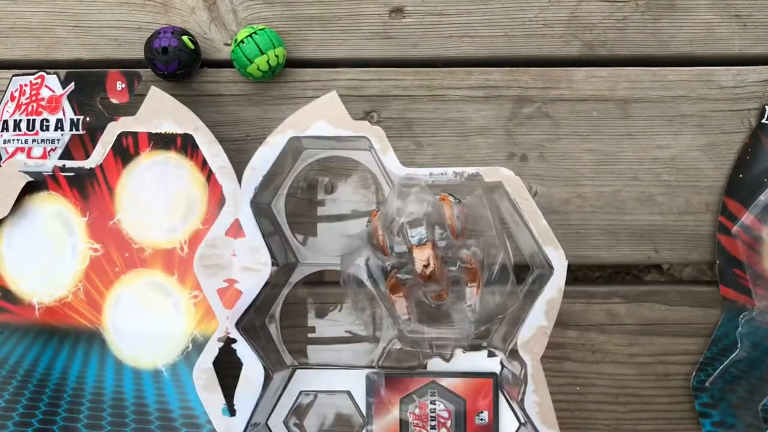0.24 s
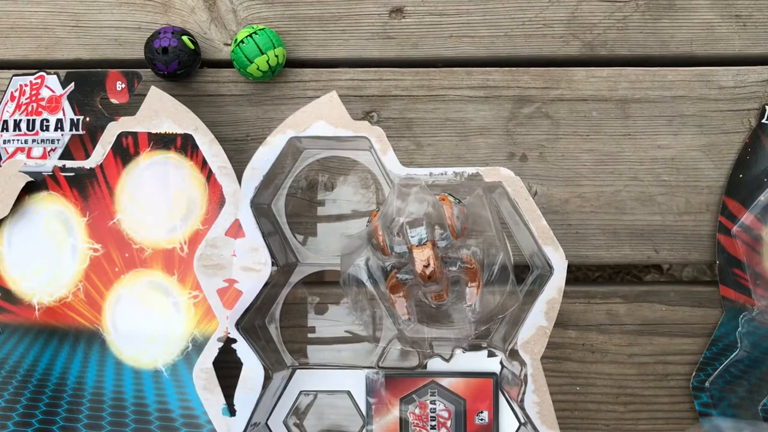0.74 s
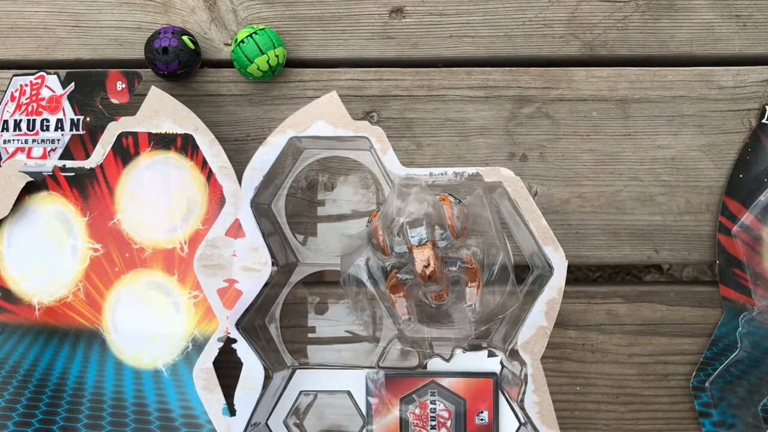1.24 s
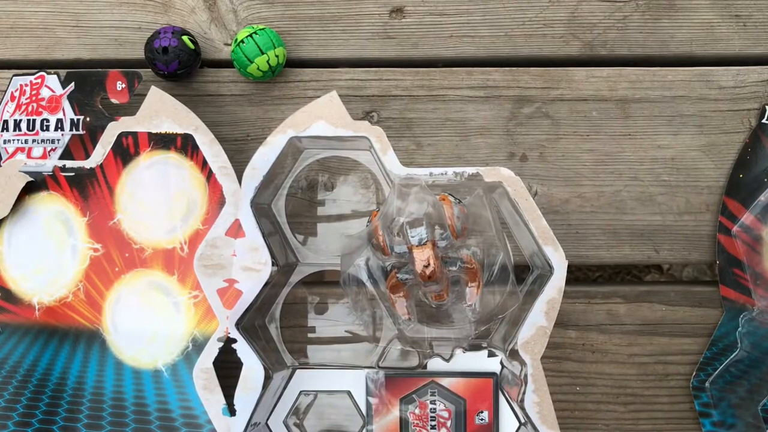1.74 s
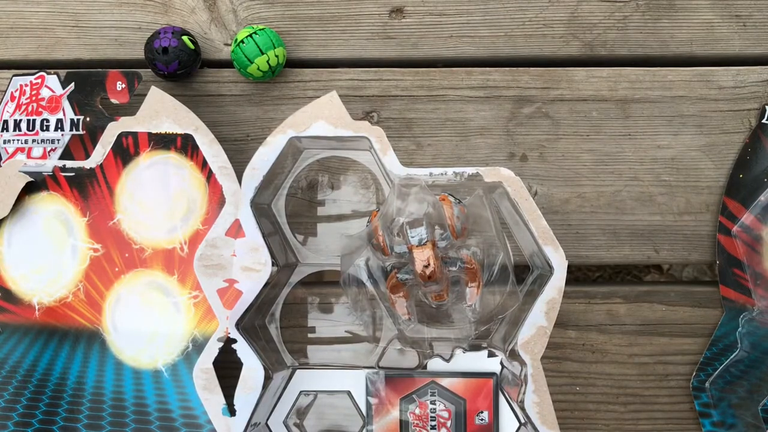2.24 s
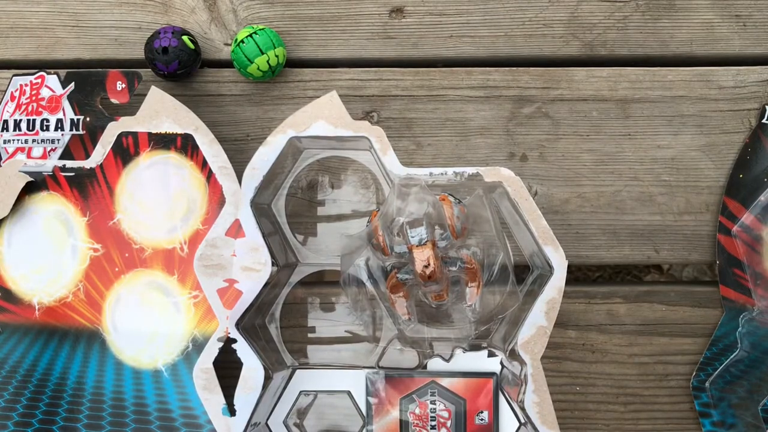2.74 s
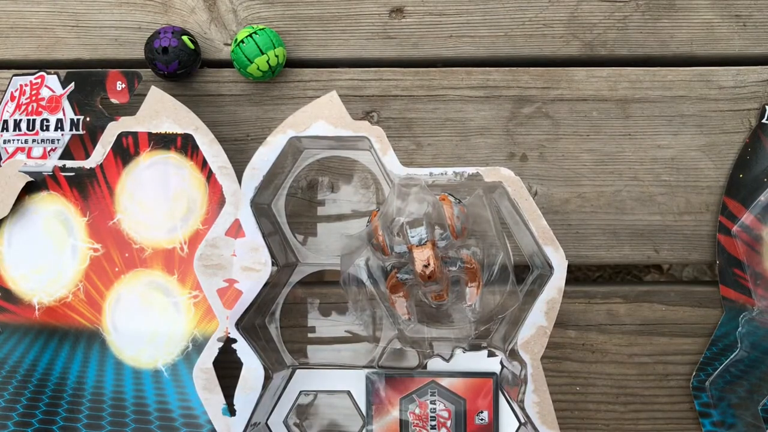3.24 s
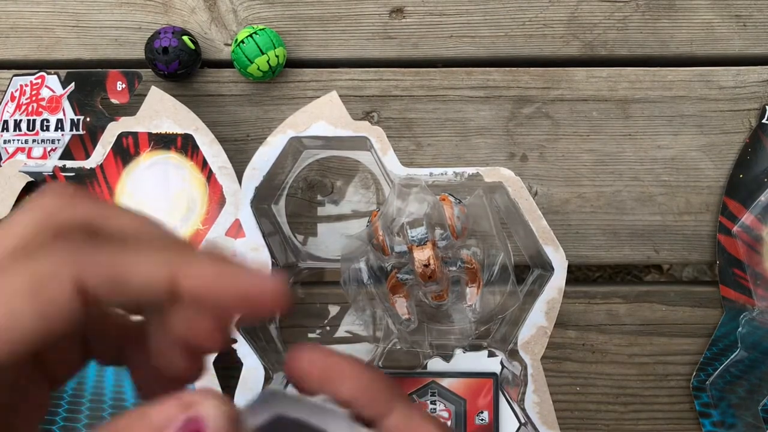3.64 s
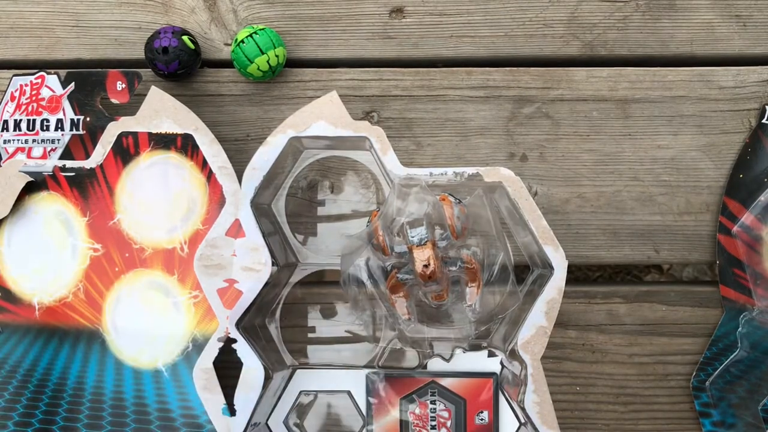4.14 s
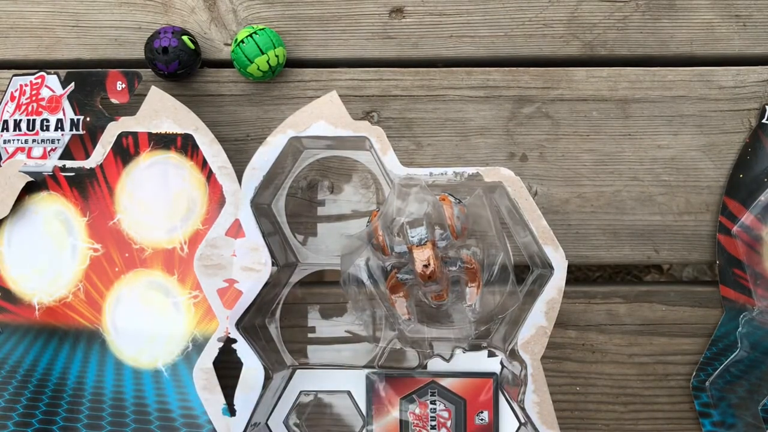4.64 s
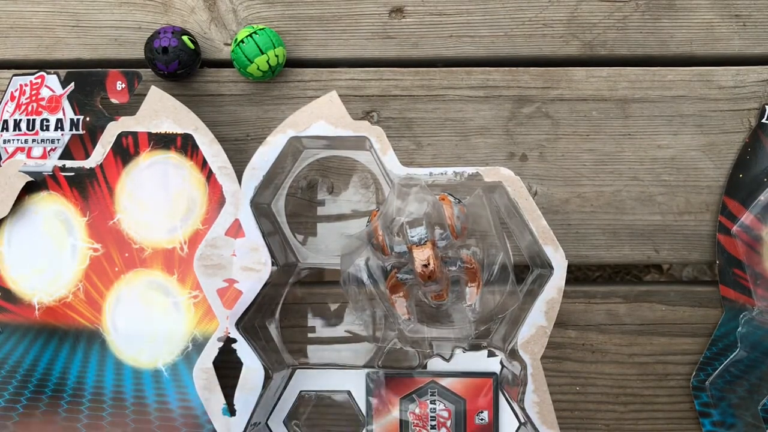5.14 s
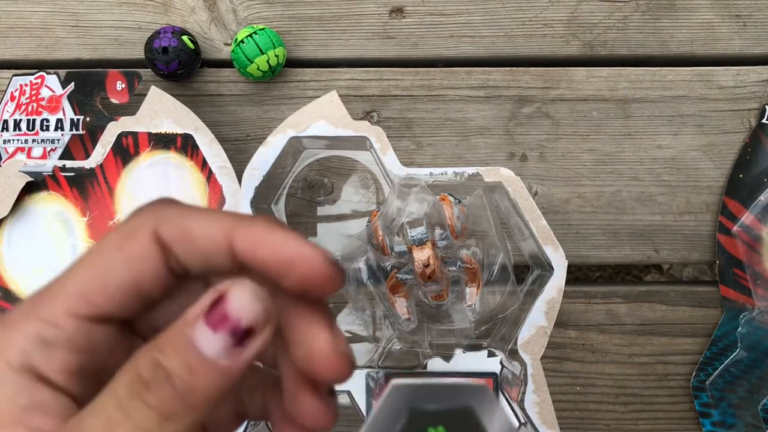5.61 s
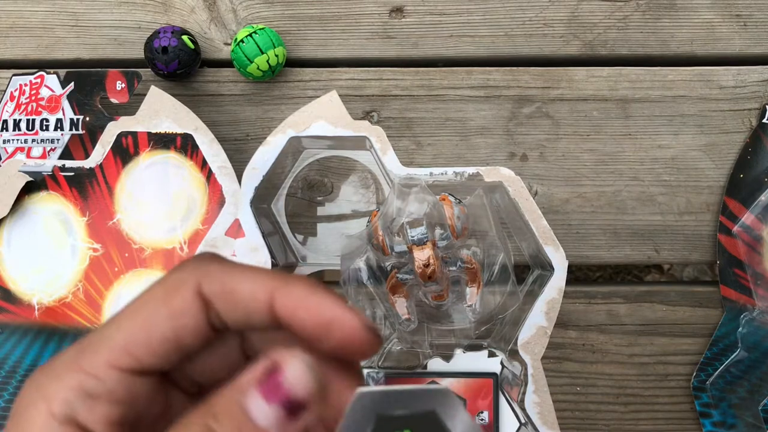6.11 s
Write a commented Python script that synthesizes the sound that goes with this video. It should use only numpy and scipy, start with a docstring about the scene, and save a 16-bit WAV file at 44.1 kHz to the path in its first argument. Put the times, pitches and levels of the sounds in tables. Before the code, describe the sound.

A dry outdoor scene at a wooden table. Thin rigid plastic buckles and pops for about a second, stops, and gives way to quiet handling: soft rubbing, plastic ticks, and clusters of crisp metallic clicks that grow sparser. Far off, a vehicle pulls away and an engine's deep drone rises, peaks and sinks into faint traffic noise and low machinery hum.

```python
"""Outdoors at a wooden table: hands crush a clear plastic blister pack, then sort plastic-and-steel tiles.
The pack is bursts of noise through wall resonances; the tiles are filtered ticks and decaying steel modes.
Skin and card rub in short grainy strokes. Behind them a distant engine revs up and falls back as a sum of
firing orders, another vehicle and far machinery hum as low tones, and far road noise is coloured noise."""
import sys
import numpy as np
from scipy import signal
from scipy.fft import rfft, irfft, next_fast_len
from scipy.io import wavfile
from scipy.ndimage import uniform_filter1d, map_coordinates

SR = 44100
rng = np.random.default_rng(int(sys.argv[2]) if len(sys.argv) > 2 else 0)


def int16_out(signal):
    """Quantize to a 16-bit WAV file."""
    q = np.round(np.clip(np.atleast_2d(signal).T, -1, 1) * 32767)
    wavfile.write(sys.argv[1], SR, q.astype(np.int16))


N = 281093  # length [samples]


def amp(db):
    """Level-to-amplitude law: 20 dB is a factor of ten."""
    return 10 ** (np.asarray(db) / 20)


def unit(x):
    """Normalisation to an rms of 1."""
    return x / np.sqrt(np.mean(x ** 2) + 1e-20)


def curves(rows):
    """Linear interpolation: one value per sample for each column after the time."""
    times, *columns = np.transpose(rows)
    return [np.interp(np.arange(N) / SR, times, column) for column in columns]


def wobble(rate, size=N):
    """Slow random modulation: a smooth curve through rate random knots a second."""
    coarse = np.arange(0, size + 64, 64)
    knots = rng.standard_normal(size // 400 + 8)
    smooth = map_coordinates(knots, [coarse * rate / SR])
    return np.interp(np.arange(size), coarse, smooth)


def filtered(x, response):
    """Linear filtering: the spectrum of x times a complex response of frequency."""
    m = next_fast_len(len(x) + min(len(x) // 2, 8192))
    spectrum = rfft(x, m) * response(np.fft.rfftfreq(m, 1 / SR))
    return irfft(spectrum, m)[:len(x)]


def band(centre_hz, width_hz):
    """Second-order resonance: a causal band-pass with gain 1 at its centre."""
    return lambda f: 1j * f * width_hz / (centre_hz ** 2 - f * f + 1j * f * width_hz)


def tone(hz, db, waver, phase=0):
    """Frequency integrates to phase: a sine of given rms level whose level and phase waver a little."""
    level = np.sqrt(2) * amp(db + 1.47 * wobble(13))
    angle = 2 * np.pi * np.cumsum(hz) / SR + phase + waver * wobble(10)
    return level * np.sin(angle)


def rush(spectrum, patchy_db):
    """Spectral shaping: coloured noise of rms 1, with patches of random gain in time and frequency."""
    z = signal.stft(rng.standard_normal(N), nperseg=512)[2]
    field = uniform_filter1d(rng.standard_normal(z.shape), size=6, axis=0)
    field = uniform_filter1d(field, size=14, axis=1)
    noise = signal.istft(z * amp(patchy_db * unit(field)), nperseg=512)[1][:N]
    f, db = np.transpose(spectrum)
    # the levels are joined along a logarithmic frequency axis
    return unit(filtered(noise, lambda hz: amp(np.interp(np.log(hz + 1), np.log(f + 1), db))))


def burst(t60, response, size=2048):
    """Impulsive excitation: a sharp crack with a puff of noise that dies away, coloured, peak 1."""
    t = np.arange(size) / SR
    puff, crack = amp(-60 * t / t60), 1.53 * amp(-60 * t / 0.0022)
    x = filtered(rng.standard_normal(size) * (puff + crack), response)
    return x / np.abs(x).max()


def creases(size, per_s, spread_db, t60):
    """Crackling noise: random creases give way in clumps, each a spike with a short noisy tail."""
    clumps = amp(4.33 * wobble(45, size))
    struck = rng.random(size) < per_s * clumps / SR
    spikes = struck * amp(spread_db * np.minimum(rng.exponential(size=size), 3))
    tail = amp(-60 * np.arange(2048) / SR / t60)
    return np.abs(signal.fftconvolve(spikes, tail)[:size]) * rng.standard_normal(size)


def add(track, s, x):
    """Superposition: mixes x into track from time s."""
    part = track[round(s * SR):][:len(x)]
    part += x[:len(part)]


# far traffic: (time [s], rumble level [dB], tyre roar level [dB], air hiss level [dB])
ROAD_LEVELS = [(1.15, -47, -61.5, -70), (1.8, -46.5, -62, -72), (2.7, -44.5, -60.5, -74),
               (3.1, -48, -61, -72.5), (3.9, -49, -61.5, -73.5), (4.6, -50, -60.5, -74.5),
               (5.3, -49.5, -61, -74.5), (6.37, -52, -63.5, -75)]
# spectral shapes of the three: (frequency [Hz], relative level [dB per Hz])
RUMBLE_SPECTRUM = [(25, -38), (40, -11.5), (60, 4.5), (85, -1.5), (130, -9), (185, -7.5), (280, -20),
                   (420, -30), (600, -42), (1200, -120)]
TYRE_SPECTRUM = [(100, -120), (200, -23), (350, -8.5), (550, -3), (800, -0.5), (1050, -1), (1400, -9),
                 (1800, -16.5), (2500, -27), (3500, -39), (5000, -48), (9000, -120)]
HISS_SPECTRUM = [(700, -120), (1500, -8), (2500, 2.5), (4300, 1), (5000, -3), (6500, -1), (7700, -5.5),
                 (9000, -1), (10500, -9), (12000, 0.5), (14000, -3), (15700, -5.5), (15950, -40)]
# a brief brighter rush from the road
PASSING_S, PASSING_LENGTH_S, PASSING_DB, PASSING_HZ = 3.4, 0.18, -70, 1510


def road():
    """Broadband noise: rumble and tyre roar swell a little, the hiss is nearly smooth, one rush passes."""
    rumble_db, tyres_db, hiss_db = curves(ROAD_LEVELS)
    rumble = amp(rumble_db + 0.93 * wobble(4.994)) * rush(RUMBLE_SPECTRUM, patchy_db=0.0)
    tyres = amp(tyres_db + 0.84 * wobble(3.92)) * rush(TYRE_SPECTRUM, patchy_db=0.97)
    hiss = amp(hiss_db) * rush(HISS_SPECTRUM, patchy_db=0.3)
    swell = np.exp(-((np.arange(N) / SR - PASSING_S) / PASSING_LENGTH_S) ** 2)
    passing = unit(filtered(rng.standard_normal(N), lambda f: band(PASSING_HZ, 600)(f) ** 2))
    return rumble + tyres + hiss + amp(PASSING_DB) * swell * passing


FADE_S = 0.18  # fade of the drones and of the vehicle pulling away
# low tones from far machinery: (start [s], end [s], pitch [Hz], level [dB])
DRONE_TONES = [(0, 6.37, 91.2, -55), (2.002, 3.2, 46.2, -57)]


def drone():
    """Periodic sources: tones of fixed nominal pitch, faded in before the start and out after the end."""
    t, out = np.arange(N) / SR, np.zeros(N)
    for start, end, hz, db in DRONE_TONES:
        fade = np.clip(np.minimum(t - start, end - t) / FADE_S + 1, 0, 1)
        out += fade * tone(np.full(N, hz), db, 0.18)
    return out


# a vehicle pulling away: (time [s], pitch [Hz], level [dB])
PULLING_AWAY = [(0, 65.1, -72), (.32, 66.98, -44), (.92, 69.1, -40), (1.15, 72.74, -51.5),
                (1.5, 77.83, -48.5), (2.1, 92.5, -60), (2.4, 100.5, -50), (3.2, 101.6, -67)]


def vehicle():
    """Pitch follows engine speed: one low tone rises and fades out at the end of its table."""
    fade = np.clip((PULLING_AWAY[-1][0] - np.arange(N) / SR) / FADE_S, 0, 1)
    return fade * tone(*curves(PULLING_AWAY), 0.22)


# engine revving up and falling back: (time [s], firing rate [Hz], firing tone level [dB])
ENGINE_REVS = [(0.0, 44.5, -50), (0.25, 45.94, -47), (0.7, 47.63, -49), (1.08, 50.8, -50.5),
               (1.4, 53.9, -47), (1.74, 62.8, -38.5), (2.06, 68.1, -28.5), (2.36, 71.4, -33),
               (2.61, 74.33, -33.5), (3.0, 68.95, -36.5), (3.25, 64.94, -39.5), (3.5, 62.2, -50),
               (3.92, 61.2, -49), (4.45, 58.8, -50), (4.85, 59.1, -44.5), (5.3, 58.76, -48.5),
               (6.37, 58.3, -55.5)]
# a second low tone just above the firing tone: (time [s], beat rate [Hz], level [dB])
THROB_BEATS = [(2.9, 6.37, -52), (3.3, 5.66, -39.5), (3.85, 3.03, -50), (4.35, 4.63, -48),
               (4.65, 5.32, -51), (5.2, 7.22, -53), (5.5, 5.32, -52), (5.8, 8.74, -51.5), (6.37, 7.63, -54)]
THROB_PHASE = 1.88  # [rad]
# second order when the firing tone is at LOUD_DB, its dB per dB of firing tone, third over second
LOUD_DB, SECOND_DB, SECOND_GROWS, THIRD_DB = -34, -49, 0.76, -11.5


def engine():
    """Harmonic series and beating: three firing orders, and a neighbouring tone that makes them throb."""
    rate_hz, first_db = curves(ENGINE_REVS)
    second_db = SECOND_DB + SECOND_GROWS * (first_db - LOUD_DB)
    out = tone(rate_hz, first_db, 0.33)
    out += tone(2 * rate_hz, second_db, 0.19)
    out += tone(3 * rate_hz, second_db + THIRD_DB, 0.78)
    beat_hz, throb_db = curves(THROB_BEATS)
    begun = np.arange(N) / SR > THROB_BEATS[0][0]
    return out + begun * tone(rate_hz + begun * beat_hz, throb_db, 0.093, THROB_PHASE)


# skin and card sliding: (start [s], length [s], level [dB], dull part [Hz], dull minus bright tilt [dB])
SCUFF_STROKES = [(1.156, 0.022, -62.5, 4330, -2.5), (1.214, 0.028, -61.5, 3400, 0.5),
                 (1.303, 0.068, -64, 3180, -1), (1.423, 0.098, -72, 3000, -3), (1.508, 0.045, -66, 3190, 8),
                 (1.555, 0.049, -68, 2780, 5), (1.632, 0.02, -56, 7700, 10), (1.679, 0.013, -68, 3320, 15),
                 (1.784, 0.038, -70.5, 3020, 5), (2.436, 0.031, -68, 3403, 8),
                 (2.75, 0.053, -66.5, 3500, -1), (2.831, .04, -71, 3100, 5), (2.986, .045, -71, 5500, 5),
                 (3.084, 0.026, -66.5, 4070, 15), (3.213, 0.018, -59, 6500, 2),
                 (3.656, 0.053, -77, 6000, 3), (3.794, .015, -60.5, 7440, 3), (4.136, 0.032, -63, 6600, 7),
                 (4.763, 0.038, -76, 8000, -6), (5.124, 0.019, -71, 7990, -1)]


def scuffs():
    """Friction noise: short grainy rubs, part dull and part bright."""
    out, t = np.zeros(N), np.arange(4096) / SR
    for s, length, db, hz, tilt_db in SCUFF_STROKES:
        grain = creases(len(t), 2500, spread_db=-2.5, t60=0.0073)
        dull = unit(filtered(grain, lambda f: band(hz, 0.6 * hz)(f) ** 2))
        bright = unit(filtered(grain, lambda f: band(12500, 9000)(f) ** 2 * (f < 15800)))
        stroke = np.clip(1.46 * np.sin(np.pi * np.minimum(t / length, 1)), 0, 1)
        rub = amp(tilt_db / 2 - 4) * dull + amp(-tilt_db / 2) * bright
        add(out, s, amp(db) * stroke * rub)
    return out


# dull ticks of plastic: (time [s], peak level [dB], pitch [Hz])
PLASTIC_TICKS = [(1.1616, -54, 4390), (1.363, -44, 3340), (1.5027, -49.5, 3100), (1.637, -42, 6500),
                 (1.684, -37.5, 3380), (2.0338, -49, 3380), (2.082, -47, 2530), (2.1348, -54.5, 2310),
                 (2.4482, -46, 3090), (2.599, -57, 3590), (2.7367, -52, 2930), (2.836, -57, 3083),
                 (2.857, -56, 3180), (2.9183, -50.5, 2870), (2.9374, -54, 2950), (2.987, -46.5, 2672),
                 (3.0112, -57, 2503), (3.0325, -61, 2510), (3.096, -49, 3800), (3.101, -45.5, 2430),
                 (3.1936, -54, 2500), (3.2698, -50, 2814), (3.281, -50, 6150), (3.6612, -55, 3290),
                 (3.804, -52, 2800), (3.9542, -49.5, 2794), (5.9895, -55, 2380), (6.1803, -57.5, 4310),
                 (6.1961, -55, 4070)]


def plastic_ticks():
    """Damped impact: plastic faces tick as short noise bursts around a pitch, with some treble."""
    out = np.zeros(N)
    for s, db, hz in PLASTIC_TICKS:
        colour = lambda f: band(hz, 0.25 * hz)(f) + 0.28 * band(7000, 8000)(f) ** 2
        add(out, s, amp(db) * burst(0.019, colour, size=1024))
    return out


# tile on tile; the point of contact picks the modes:
# (time [s], click peak level [dB], then levels of mode groups 0, 2, 3, 4 [dB])
TILE_CLINKS = [(2.0438, -44.5, -82, -67, -66, -72), (2.0674, -46, -76, -42, -54, -56),
               (2.0893, -62, -85, -73, -67, -70), (2.1183, -51, -81, -76, -81, -80),
               (2.1608, -47.5, -74, -71, -79, -80), (2.2841, -53, -83, -76, -79, -74),
               (3.065, -42, -86, -68, -67, -61), (3.0951, -55, -80, -72, -70, -65),
               (3.1238, -57, -85, -62, -64, -69), (3.1527, -48, -83, -54, -64, -72),
               (3.1813, -55, -87, -66, -67, -72), (3.2201, -52, -81, -67, -57, -65),
               (3.26, -45, -61.5, -48, -66, -65), (3.8327, -47, -61.5, -68, -55, -68),
               (3.8411, -44.5, -85, -72, -63, -70), (3.9001, -64, -84, -50, -56, -58),
               (3.9217, -66, -74, -67, -79, -80), (3.9454, -54, -67, -75, -79, -76),
               (3.9676, -66, -70, -61, -78, -82), (4.0346, -46.5, -64, -74, -78, -77),
               (4.4095, -37, -62, -61, -52, -57), (4.4311, -40.5, -61, -67, -64, -70),
               (4.4532, -55, -81, -79, -78, -75), (5.1284, -60, -84, -69, -77, -77),
               (5.2589, -33.5, -88, -45, -55, -52), (5.3485, -54, -79, -72, -77, -81),
               (5.3567, -47, -80, -58, -71, -75), (5.518, -38, -72, -47, -60, -68),
               (5.5389, -52, -68, -69, -71, -75), (5.563, -47.5, -74, -72, -69, -65),
               (5.6539, -42.5, -83, -62, -77, -77), (5.8588, -44, -86, -63, -74, -77),
               (6.3126, -53, -87, -73, -78, -75)]
# modes of the steel insert: (mode group, frequency [Hz], level over its group [dB], ungripped t60 [s])
STEEL_MODES = [(0, 2790, 0, .3), (4, 14150, 0, .3), (1, 3995, -14, .04), (1, 6600, 0, .035),
               (2, 11650, -6, .04), (2, 12060, -14, .06), (2, 12580, 0, .05), (3, 13400, -4, .07),
               (3, 13670, 0, .08), (4, 14390, -9, .12)]
# how hard the fingers damp the steel: (time [s], decay speed factor)
FINGER_GRIP = [(2.1, 1.5), (3.1, 1.1), (3.25, 2.5), (3.98, 2.9), (4.45, 1.51), (5.25, 1.3), (5.5, 0.9)]
MIDDLE_DB = -18.5  # mode group 1 over the click


def steel_clinks():
    """Modal synthesis: steel inserts click and ring as decaying sines, damped by the fingers."""
    out, t = np.zeros(N), np.arange(SR // 4) / SR
    onset = 1 - np.exp(-t / 0.00025)
    for s, click_db, lowest_db, *high_db in TILE_CLINKS:
        group_db = [lowest_db, click_db + MIDDLE_DB, *high_db]
        grip = np.interp(s, *np.transpose(FINGER_GRIP))
        add(out, s, amp(click_db) * burst(0.008, edge, size=1024))
        rings = [amp(group_db[int(group)] + db - 60 * grip * t / t60) * np.sin(2 * np.pi * hz * t)
                 for group, hz, db, t60 in STEEL_MODES]
        scatter = amp(rng.normal(0, 2.5, len(STEEL_MODES)))  # each mode's level varies per strike
        add(out, s, scatter @ rings * onset)
    return out


# resonances of the pack's walls: (frequency [Hz], width [Hz], level [dB])
WALL_MODES = [(510, 43, 7.5), (1032, 33, 8), (1253, 20, -1), (1720, 27, -1), (2520, 130, -15),
              (3610, 23, -14), (5360, 250, -25), (7300, 440, -15)]


def walls(f):
    """Modal superposition: the wall resonances sum with alternating sign."""
    return sum((-1) ** k * amp(db) * band(hz, width)(f) for k, (hz, width, db) in enumerate(WALL_MODES))


def boom(f):
    """Low resonance: the wide walls flexing."""
    return band(260, 400)(f) * (band(250, 400)(f) + 0.37 * band(540, 60)(f))


def body(f):
    """Middle resonance: a broad band coloured by the wall modes."""
    return band(1200, 1800)(f) * (band(1100, 1500)(f) + 0.52 * walls(f))


def face(f):
    """Upper resonance: a higher band coloured by the wall modes."""
    return band(3000, 2500)(f) * (0.28 * band(3000, 2500)(f) + walls(f))


def edge(f):
    """Broad high band: the bright part of snaps, rustle and steel clicks."""
    return band(9000, 12000)(f) ** 2


# squeezing of the pack, twice: (time [s], crackle level [dB])
SQUEEZE_LEVELS = [(0.0, -38.5), (0.1, -40.5), (0.145, -42.5), (0.17, -41), (0.22, -38.5), (0.36, -65.5),
                  (0.53, -51), (0.55, -38.5), (0.66, -52), (0.705, -40.5), (0.79, -57.5), (0.82, -39),
                  (0.855, -57), (0.87, -45.5), (1.04, -49), (1.12, -78)]
# share of flexing and bright rustle: (time [s], flexing over crackle [dB], rustle over crackle [dB])
CRUSH_SHARES = [(0, 1, -22), (.13, 4.5, -42), (.165, -3, -11.5), (.3, -1.5, -20), (.55, -5, -18),
                (.71, 3, -25.5), (.78, 2, 3), (.83, -1, -28), (.88, 1.5, -27), (1.0, -2, -11),
                (1.06, -7, -6)]
FLEX_SMOOTH_S = 0.056  # the wide walls follow the squeeze slowly


def pack_crackle():
    """Source and filter: creases crackle through the walls' resonances as the pack is squeezed."""
    out, n = np.zeros(N), SR * 9 // 8
    crackle_db = curves(SQUEEZE_LEVELS)[0][:n]
    flex_db, rustle_db = [column[:n] for column in curves(CRUSH_SHARES)]
    flex = uniform_filter1d(amp(crackle_db + flex_db), size=round(FLEX_SMOOTH_S * SR))
    crackle = filtered(creases(n, 450, spread_db=4.0, t60=0.014), lambda f: body(f) + 0.68 * face(f))
    flexing = filtered(creases(n, 900, spread_db=1.0, t60=0.036), boom)
    rustle = filtered(creases(n, 660, spread_db=0.0, t60=0.014), edge)
    add(out, 0, amp(crackle_db - 7) * unit(crackle))
    add(out, 0, flex * unit(flexing))
    add(out, 0, amp(crackle_db + rustle_db) * unit(rustle))
    return out


# buckling snaps: (time [s], reference level [dB], wide panel [Hz], narrow panel [Hz],
# body relative to reference [dB], edge relative to reference [dB]); each part adds its own offset
PANEL_SNAPS = [(0.0034, -37, 850, 2300, 5, -13), (0.015, -33, 880, 3950, -7, -9),
               (0.0289, -43.5, 1370, 3030, 5, 4), (0.0575, -31, 1380, 2560, 0.5, -20),
               (0.081, -37, 1700, 2200, 9, -15), (0.0964, -33.5, 1230, 2720, 4.5, -1.5),
               (0.1198, -40.5, 1060, 2590, 6.5, -18), (0.156, -33.5, 1100, 2530, 1, -4),
               (0.1678, -34, 1570, 3240, 6, -9), (0.1844, -41, 767, 3210, -3, -6),
               (0.2014, -33, 1710, 2870, 0, -21), (0.2249, -29, 900, 3350, -7.5, 1.5),
               (0.2592, -47, 960, 2820, 1, -8), (0.2816, -39.5, 1030, 2610, -9, -3.5),
               (0.3047, -55.5, 1060, 2590, 7, -10), (0.4651, -34.5, 1580, 3600, -9.5, -6),
               (0.493, -43, 1680, 3550, -8, -9), (0.5275, -31.5, 910, 3115, -21, -27),
               (0.5478, -24.5, 1740, 2680, 1, -18), (0.5609, -30.5, 930, 3500, -5, -1.5),
               (0.5772, -42.5, 1750, 2570, 5.5, -14), (0.6, -30.5, 810, 2500, -8, -9),
               (0.6268, -41, 939, 3040, -20, -8), (0.6721, -28.5, 848, 2440, -11, -17),
               (0.688, -46, 920, 3950, 6, -17), (0.6999, -28, 1326, 2860, -2.5, -33),
               (0.7121, -44.5, 1002, 4560, 11, -21), (0.7255, -46, 820, 3930, 5, -15),
               (0.775, -38, 1050, 3880, -23, -5), (0.809, -40, 1306, 2500, 4.5, -21),
               (0.822, -35, 1290, 2224, -3.5, -7), (0.867, -30, 1420, 2450, -9, -10.5),
               (0.8738, -37, 1351, 2510, -5, -11), (0.8993, -48, 1390, 2380, 2.5, -20),
               (0.9226, -36, 1000, 2510, -0.5, -19), (0.931, -32.5, 1290, 3910, -11, -5.5),
               (0.9448, -37.5, 1016, 2950, -1, -12), (0.9668, -43.5, 1010, 2670, -2, -5),
               (0.995, -39.5, 1040, 3995, -17, -6.5), (1.0337, -46.5, 1065, 3660, -10, 0),
               (1.0495, -50, 880, 3250, 0, 1)]
THUMP_DB, THUMP_FOLLOWS = -4, 0.53  # a snap's thump over its reference, and its dB per dB of body


def pack_snaps():
    """Snap-through buckling: whole panels flip at their own pitch, their treble dying first."""
    out = np.zeros(N)
    for s, db, wide_hz, narrow_hz, body_db, edge_db in PANEL_SNAPS:
        wide, narrow = band(wide_hz, 0.056 * wide_hz), band(narrow_hz, 0.051 * narrow_hz)
        thump_db = db + THUMP_DB + THUMP_FOLLOWS * body_db
        add(out, s, amp(db - 1.5) * burst(0.043, lambda f: face(f) * (1 + 2.0 * narrow(f))))
        add(out, s, amp(thump_db) * burst(0.093, boom, size=4096))
        add(out, s, amp(db + body_db + 3.0) * burst(0.064, lambda f: body(f) * (1 + 3.8 * wide(f))))
        add(out, s, amp(db + edge_db + 3.0) * burst(0.03, edge))
    return out


def scene():
    """Superposition of all sources, from the background to the hands at the table."""
    background = road() + drone() + vehicle() + engine()
    sorting = scuffs() + plastic_ticks() + steel_clinks()
    crushing = pack_crackle() + pack_snaps()
    return (background + sorting + crushing)[None]


TOP_HZ = 16532  # band limit


def record(dry):
    """Band limiting: the microphone rolls off the deep bass and nothing is kept above the band limit."""
    return filtered(dry[0], lambda hz: (hz < TOP_HZ) / (1 + (33 / (hz + 1)) ** 4))[None]


dry = scene()
out = record(dry)
int16_out(out)
```